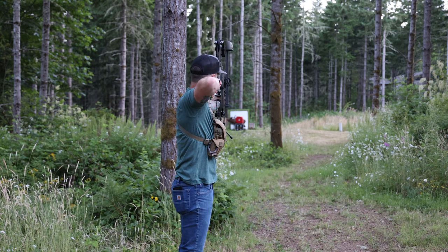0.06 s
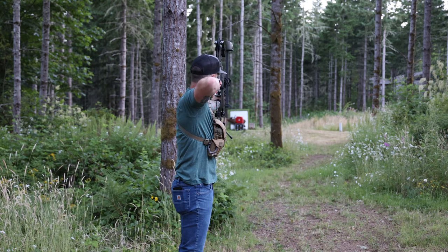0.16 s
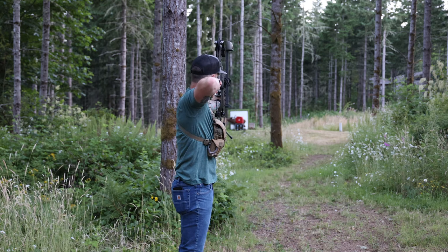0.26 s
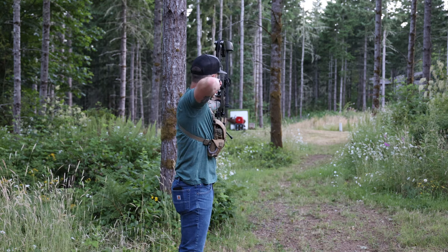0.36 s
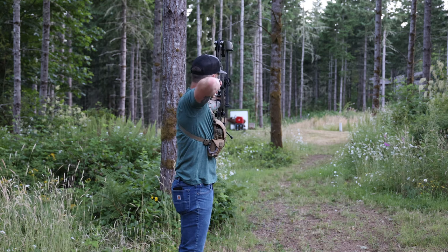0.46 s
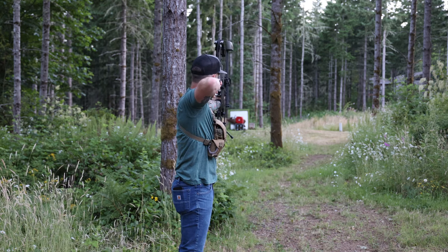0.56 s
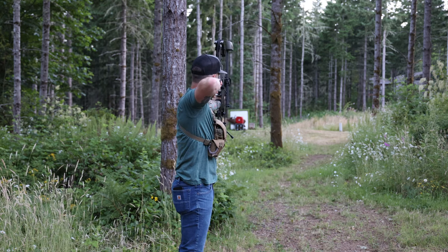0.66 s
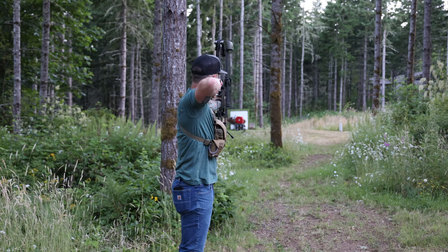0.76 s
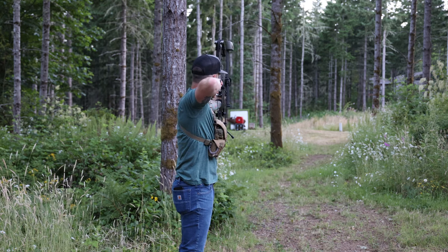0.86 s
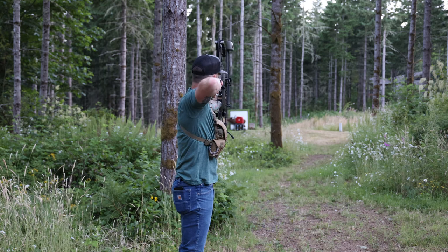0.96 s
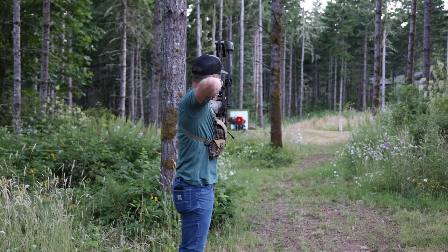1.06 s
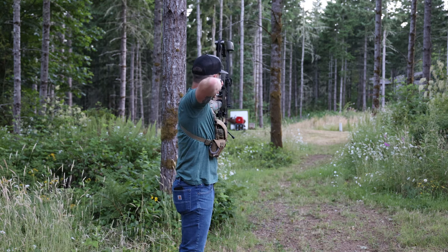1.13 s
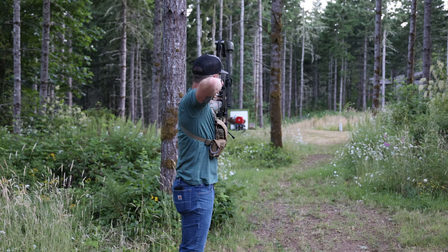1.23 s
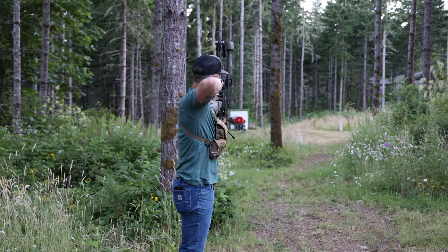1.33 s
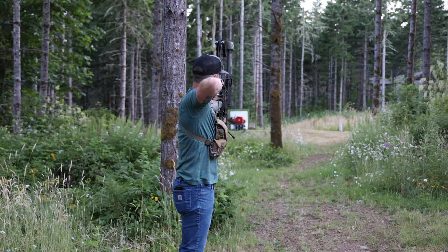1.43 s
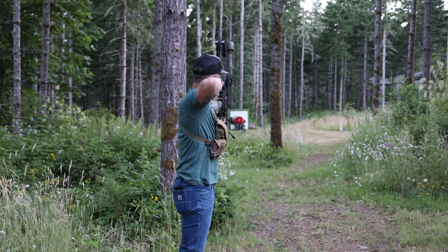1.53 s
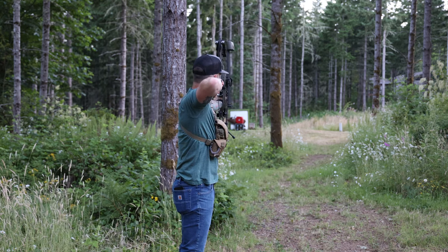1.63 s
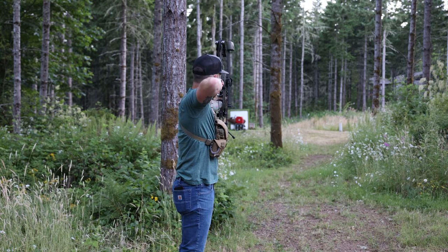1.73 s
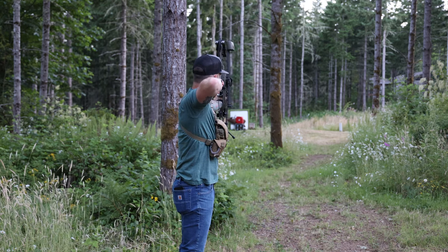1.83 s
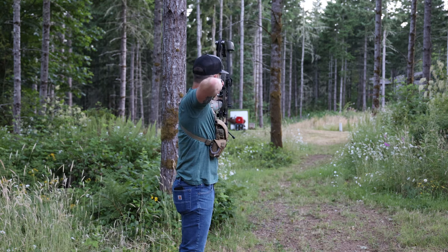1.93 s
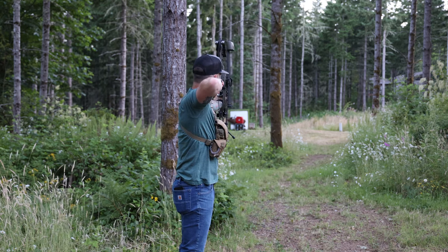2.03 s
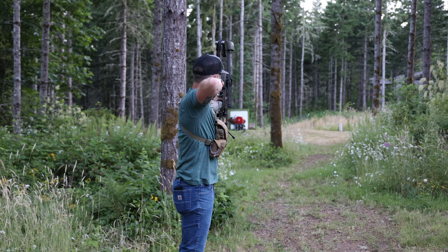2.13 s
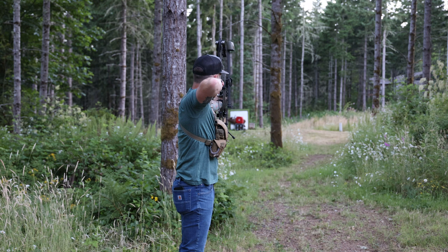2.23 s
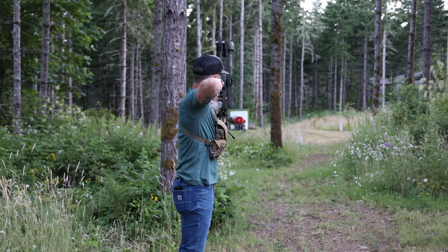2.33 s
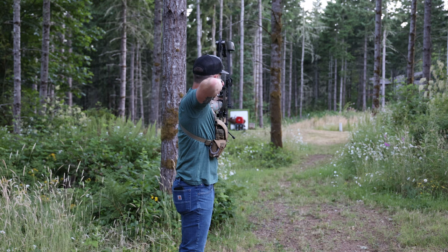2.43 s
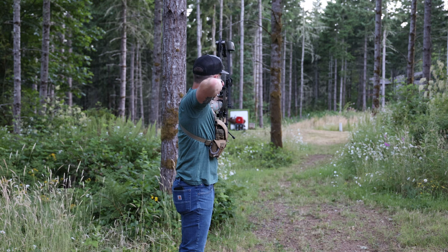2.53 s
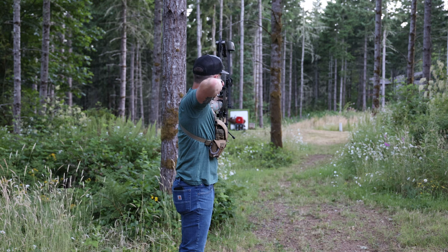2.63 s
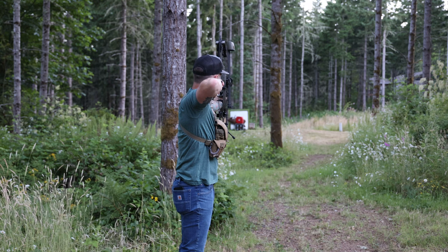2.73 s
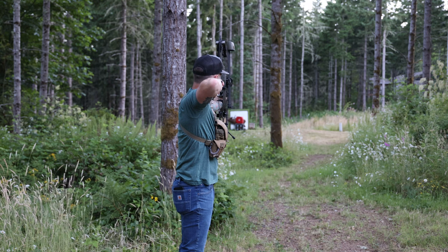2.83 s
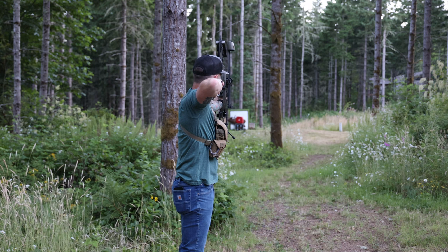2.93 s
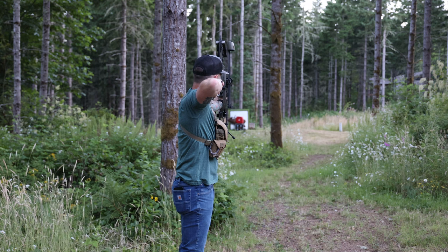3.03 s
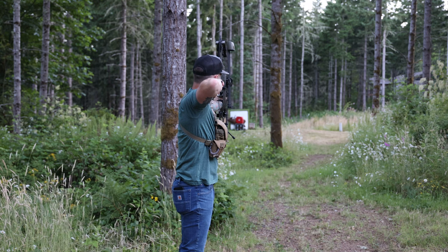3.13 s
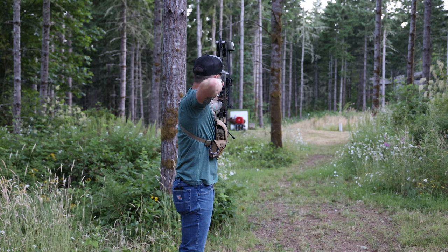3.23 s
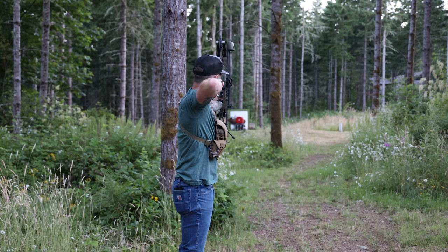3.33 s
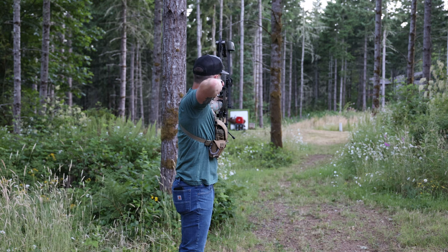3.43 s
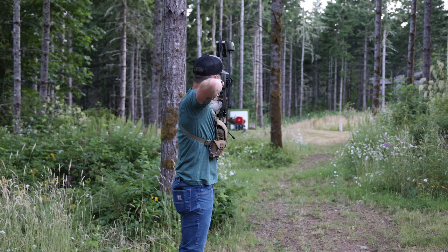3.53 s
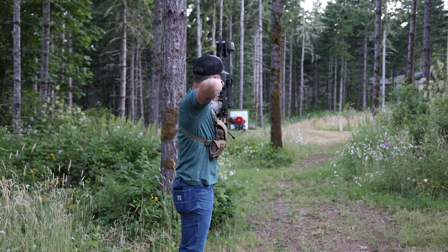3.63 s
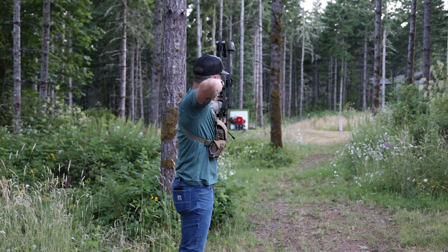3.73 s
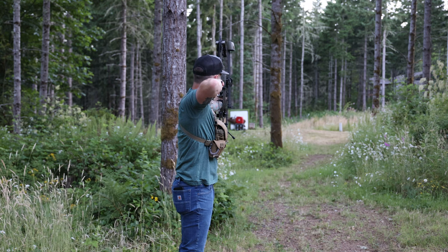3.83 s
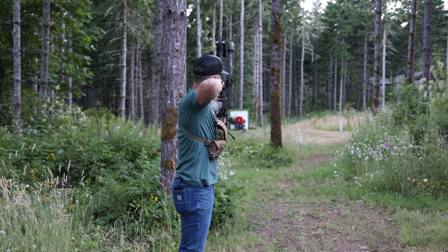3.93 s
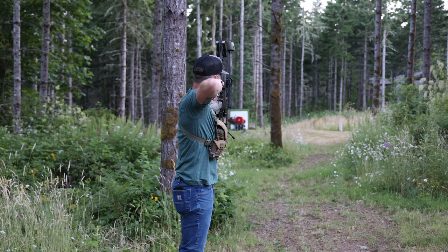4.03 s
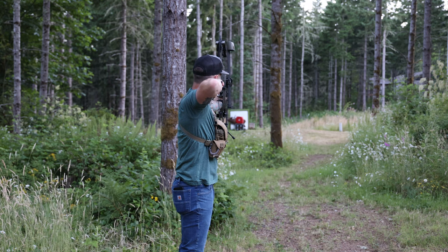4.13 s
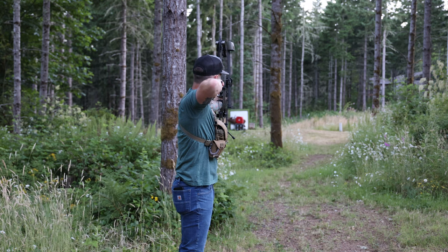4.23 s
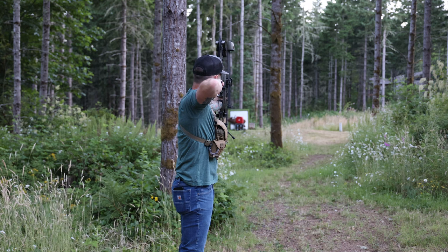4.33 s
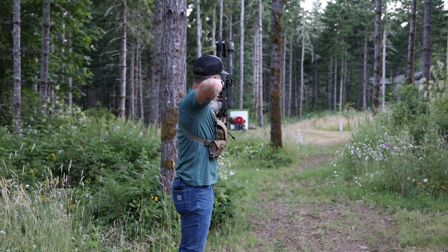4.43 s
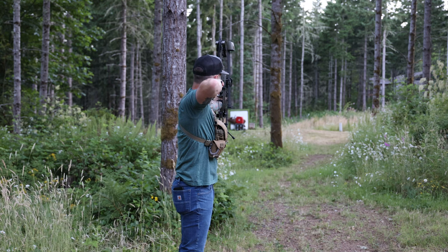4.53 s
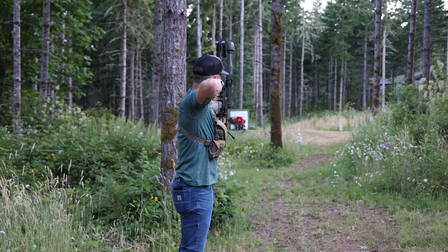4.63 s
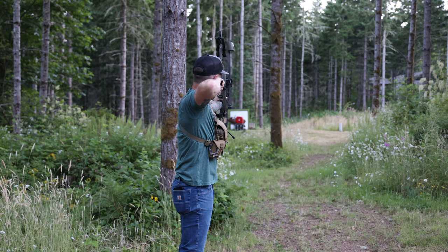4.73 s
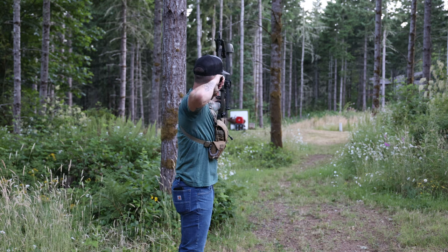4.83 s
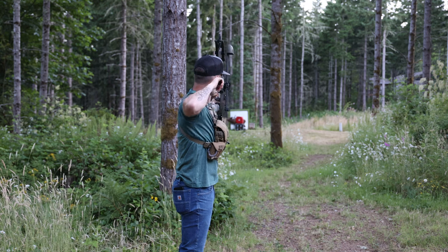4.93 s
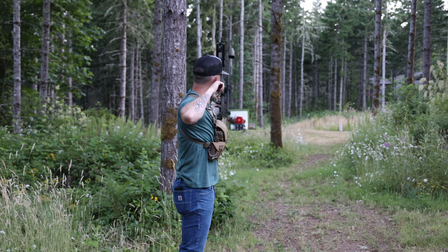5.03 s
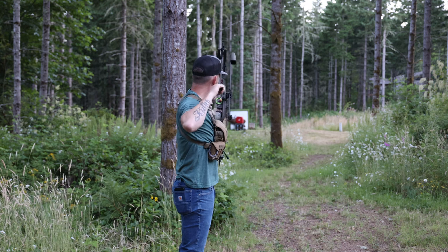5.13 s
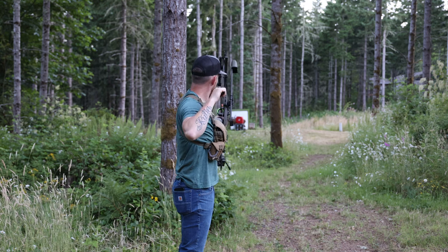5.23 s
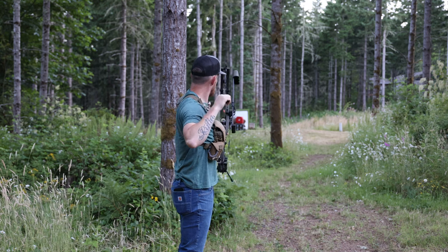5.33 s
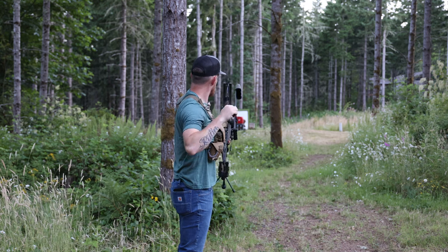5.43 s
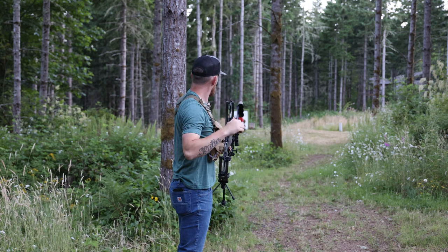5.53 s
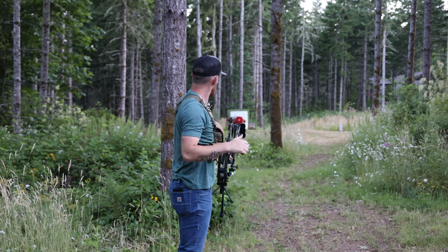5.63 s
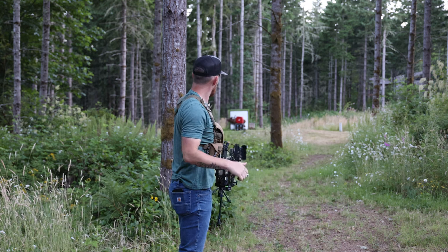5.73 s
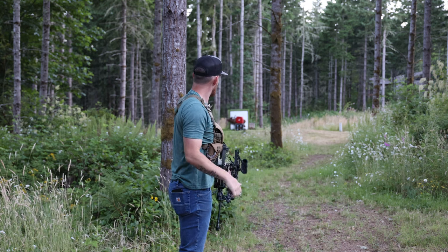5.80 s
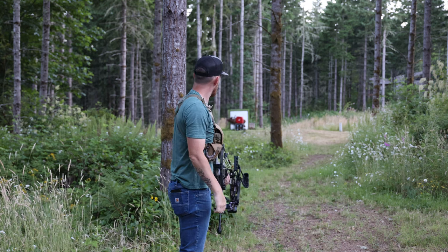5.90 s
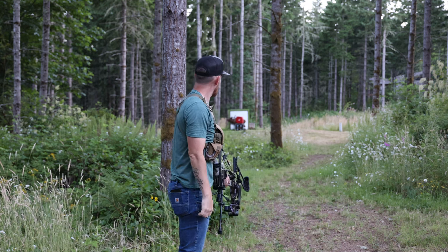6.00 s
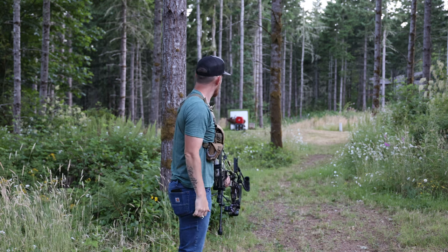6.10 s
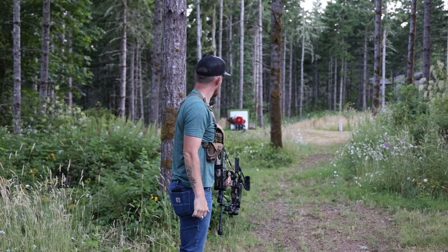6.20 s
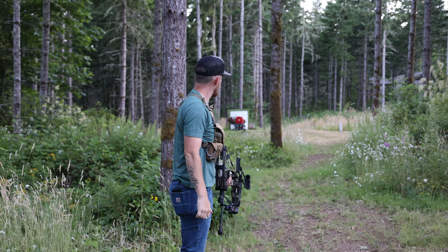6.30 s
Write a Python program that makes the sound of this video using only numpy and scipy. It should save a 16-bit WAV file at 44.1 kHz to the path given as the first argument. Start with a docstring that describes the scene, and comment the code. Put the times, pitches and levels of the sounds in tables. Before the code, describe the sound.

A quiet forest clearing with soft, receding road noise, faint engine hums and a small bird giving short chips about every second. Late on, a compound bow close to the microphone clicks and slams with a very loud crack. Half a second later the arrow smacks into a foam target farther off. Both hits scatter among the trees and die away, leaving chips and faint steady hiss.

```python
"""A distant road hushes away under faint engine hums while a small bird chips: filtered noise, sines, falling tones.
In a forest clearing a compound bow is shot close by: its release clicks in noise bursts, the arrow zips off the rest
as a climbing whistle, and the string slams home in cracks that ring the bow's decaying modes.
Half a second later the arrow smacks into a foam target: a coloured pulse, crunching noise and sagging thuds.
Decaying noise echoes scatter shot, strike and birds among the trees; a steady hiss lies under it all."""
import sys
import numpy as np
from scipy import signal
from scipy.fft import rfft, irfft
from scipy.io import wavfile

SR = 44100
rng = np.random.default_rng(int(sys.argv[2]) if len(sys.argv) > 2 else 0)


def generate_wav(signal):
    """Clip the signal to [-1, 1] and save it as 16-bit WAV at the path in sys.argv[1]."""
    frames = np.transpose(np.atleast_2d(signal))
    scaled = np.clip(frames, -1, 1) * 32767
    pcm = np.round(scaled).astype(np.int16)
    wavfile.write(sys.argv[1], SR, pcm)


N = 280476
TIME = np.arange(N) / SR

# string, cams and limbs hitting their stops: start_s, ring_db, crack_db, crack_t60_s
BLOWS = [(4.8392, -20, -19.5, 0.0091), (4.8413, 1, -5.5, 0.014), (4.8456, -26, -8, 0.012),
         (4.8506, -27, -18.5, .04)]
# arrow striking the target: start_s, smack_db, thump_db
TARGET = (5.3443, 6.2, -22)


def undb(db):
    """Decibels to gain."""
    return 10 ** (np.asarray(db) / 20)


def unit(x):
    """Scale to an rms of one."""
    return x / np.sqrt(np.mean(x ** 2))


def seconds(size):
    """Time axis of so many samples."""
    return np.arange(size) / SR


def fade(t, t60):
    """Exponential decay, 60 dB down after t60 seconds."""
    return np.exp(-np.log(1000) * t / max(t60, 1 / SR))


def envelope(t, length_s, attack_s, release_s):
    """Straight attack, hold and release; silent before zero and after the length."""
    return np.clip(np.minimum(t / attack_s, (length_s - t) / release_s), 0, 1)


def walk(rate):
    """Random wander with a spread near one: straight lines between random knots, rate knots a second."""
    knots = rng.standard_normal(1024)
    return np.interp(TIME * rate, np.arange(len(knots)), knots)


def add(track, s, sound):
    """Mix a sound into a track at time s."""
    start = int(round(s * SR))
    track[start:start + len(sound)] += sound[:N - start]


def on_log_axis(hz, points_hz, values):
    """Values joined by straight lines over log frequency."""
    return np.interp(np.log(hz + 1), np.log(points_hz), values)


def response(points, size=1024):
    """Minimum-phase impulse response with the given (Hz, relative dB) colour and unit energy."""
    hz = np.fft.rfftfreq(size, 1 / SR)
    log_gain = np.log(undb(on_log_axis(hz, *np.transpose(points))))
    # folding the cepstrum onto positive time packs the energy at the start
    cepstrum = irfft(log_gain)
    cepstrum[1:size // 2] *= 2
    cepstrum[size // 2 + 1:] = 0
    impulse = irfft(np.exp(rfft(cepstrum)))
    return impulse / np.linalg.norm(impulse)


def colour(x, points, size=1024):
    """Filter a sound by a (Hz, relative dB) colour."""
    return signal.oaconvolve(x, response(points, size=size))[:len(x)]


def cut(x, hz, kind, order=2):
    """Butterworth low-pass or high-pass filter."""
    sections = signal.butter(order, min(hz, .45 * SR), kind, fs=SR, output="sos")
    return signal.sosfilt(sections, x)


def crack(points, t60):
    """Contact noise: random-sign pulses, coloured and dying away exponentially."""
    t = seconds(size=4096)
    return colour(rng.choice([-1, 1], len(t)) * fade(t, t60), points)


def burst(s, power):
    """A hit as the whole forest hears it: one pulse of smooth colour at time s."""
    out = np.zeros(N)
    add(out, s, response(power))
    return out


def hiss(db=-60, channel_db=-76):
    """Steady microphone hiss, and a fainter white hiss, drawn separately for each channel."""
    # microphone hiss: pitch_hz, relative_db
    hiss_colour = [(100, -7), (2500, 0), (4000, 4.5), (7000, 1), (11000, 0), (16000, -3)]
    microphone = undb(db) * colour(rng.standard_normal(N), hiss_colour)
    separate = undb(channel_db) * rng.standard_normal((2, N))
    return microphone + separate


def road(split_hz=1000, waver_db=.5, rumble_db=-62):
    """Tyre roar draws away, its body fading faster than its upper band, over a low rumble."""
    # tyre roar: pitch_hz, relative_db
    road_colour = [(15, -52), (25, -20.5), (64, -8), (96, -14), (119, -10.5), (140, -17.5), (197, -10),
                   (306, -11), (331, -14), (430, -8.5), (629, -6), (900, -1), (1150, -2.5), (1850, -14),
                   (3000, -24), (3900, -32), (6600, -120)]
    # low rumble under the roar: pitch_hz, relative_db
    rumble_colour = [(25, -8), (80, -4), (200, 0.5), (380, -5), (1500, -42), (5000, -64)]
    body_start_db, body_fade_db_per_s = -39.5, 1.39
    upper_start_db, upper_fade_db_per_s = -42.5, 1.0
    # one passing vehicle lifts the upper band and the rumble for a moment
    swell_at_s, swell_width_s, swell_peak_db = 3.02, 0.68, 2

    swell_db = swell_peak_db * np.exp(-((TIME - swell_at_s) / swell_width_s) ** 2)
    body_db = body_start_db - body_fade_db_per_s * TIME
    upper_db = upper_start_db - upper_fade_db_per_s * TIME + swell_db
    # separate noise for each band
    body = cut(colour(rng.standard_normal(N), road_colour, size=4096), split_hz, "low", order=3)
    upper = cut(colour(rng.standard_normal(N), road_colour, size=4096), split_hz, "high", order=3)
    tyres = unit(body) * undb(body_db) + unit(upper) * undb(upper_db)
    rumble = colour(rng.standard_normal(N), rumble_colour, size=4096)
    return tyres * undb(waver_db * walk(9)) + undb(rumble_db + swell_db) * rumble


def engines(waver_db=2):
    """Of each far engine only one wavering, slowly sinking tone carries through the trees."""
    # hums drifting in and out: start_s, length_s, start_pitch_hz, level_db (rms)
    hums = [(-.25, 1.3, 76, -55), (-.25, 0.79, 206, -56.5), (1.05, .6, 62, -55), (1.4, 1.3, 65.3, -54.5),
            (2.452, 1.3, 61, -64.5), (4.501, 2.3, 79, -66.5), (4.854, .7, 194, -60),
            (5.656, 0.49, 190.5, -56.5)]
    attack_s, release_s, sag_hz_per_s = 0.23, 0.26, 2.3
    out = np.zeros(N)
    for s, length, start_hz, db in hums:
        t = TIME - s
        pitch_hz = start_hz - sag_hz_per_s * t
        tone = np.sqrt(2) * np.sin(2 * np.pi * np.cumsum(pitch_hz) / SR)
        level = undb(db + waver_db * walk(24))
        out += level * envelope(t, length, attack_s, release_s) * tone
    return out


def peeps(quaver=0.011):
    """Birds deeper in the wood: thin whistles that swell and die, their pitch quavering slightly."""
    # faint whistles: start_s, pitch_hz, level_db (before scene() sets the overall level), length_s
    peep_list = [(0.547, 7900, -67, .1), (1.489, 5430, -61, 0.047), (3.271, 2570, -59, 0.14),
                 (4.64, 6230, -61, 0.026)]
    out = np.zeros(N)
    for s, hz, db, length in peep_list:
        swell = np.hanning(int(length * SR))
        pitch_hz = hz * (1 + quaver * walk(140)[:len(swell)])
        add(out, s, undb(db) * swell * np.sin(2 * np.pi * np.cumsum(pitch_hz) / SR))
    return out


def bird(second_db=-1, third_db=-14, throat_width_hz=1100, plunge_power=1.52):
    """Each chip plunges over two octaves; its harmonics light up as they cross the throat resonance."""
    # chips: start_s, level_db, throat_hz, throat_height_db
    chip_list = [(0.2443, -35, 5870, 7.5), (0.8502, -35.5, 5600, 10), (1.6324, -38, 6200, 12.5),
                 (2.5822, -37, 5530, 6.5), (3.2296, -32.5, 5800, 7), (3.7327, -34.5, 5820, 10),
                 (4.258, -34, 6230, 6), (4.764, -33.5, 5860, 6.5), (5.1394, -37.5, 5500, 2.5),
                 (6.1913, -41.5, 6700, 17.5)]
    # what the beak lets out: pitch_hz, gain_db
    beak_colour = [(2000, -18), (3100, -6), (4300, -3), (6300, -1.5), (7400, -3.5), (8600, -0.5),
                   (9600, -6), (11000, -14), (14000, -32)]
    # every chip falls from a high note and levels out on a low one
    top_hz, bottom_hz, plunge_s = 10330, 2188, .0033
    length_s, attack_s, release_s = 0.012, .0008, .006

    out, t = np.zeros(N), seconds(size=600)
    pitch_hz = bottom_hz + (top_hz - bottom_hz) * np.exp(-(t / plunge_s) ** plunge_power)
    shape = envelope(t, length_s, attack_s, release_s)
    for s, db, throat_hz, height_db in chip_list:
        for k, harmonic_db in enumerate([0, second_db, third_db], 1):
            hz = k * pitch_hz
            throat_db = height_db / (1 + (2 * (hz - throat_hz) / throat_width_hz) ** 2)
            beak_db = on_log_axis(hz, *np.transpose(beak_colour))
            # harmonics stay silent above half the sample rate
            tone = (hz < SR / 2) * np.sin(2 * np.pi * np.cumsum(hz) / SR)
            add(out, s, undb(db + harmonic_db + throat_db + beak_db) * shape * tone)
    return out


def forest(patchy=0.25, near_rise_s=0.0011, far_rise_s=0.1):
    """Two echo responses in decaying noise: a quick scatter from the brush, a long one from the trunks."""
    # scatter from ground, brush and trunks: pitch_hz, near_db, near_t60_s, far_db, far_t60_s
    scatter = [(150, -15, .2, -5, 3.7), (350, -11, 0.31, -22, 1.3), (700, 2, 0.18, -43, 1.3),
               (1440, -8.5, 0.22, -14.5, 1.7), (3500, -10.5, 0.2, -21.5, 1.3), (7950, -11, 0.19, -21, 1.04),
               (14000, -12.5, .19, -26, 2.1)]
    t = seconds(size=65536)
    hz = np.fft.rfftfreq(len(t), 1 / SR)
    # patchy noise: some echoes stand out by chance
    patches = np.exp(patchy * rng.standard_normal(len(t)))
    echoes = rfft(unit(rng.standard_normal(len(t)) * patches))
    near, far = 0, 0
    # each row of the identity matrix picks out one band, cross-fading into its neighbours
    for share, (_, near_db, near_t60, far_db, far_t60) in zip(np.eye(len(scatter)), scatter):
        band = irfft(echoes * on_log_axis(hz, np.transpose(scatter)[0], share))
        brush = fade(t, near_t60) * (1 - np.exp(-t / near_rise_s))
        trunks = fade(t, far_t60) * (1 - np.exp(-t / far_rise_s))
        near = near + band * undb(near_db) * brush / np.linalg.norm(brush)
        far = far + band * undb(far_db) * trunks / np.linalg.norm(trunks)
    return near, far


def among_trees(sound, echoes, near_db, far_db):
    """What brush and trunks scatter back of a sound, by convolution with their echoes."""
    near, far = echoes
    return signal.oaconvolve(sound, undb(near_db) * near + undb(far_db) * far)[:N]


def target(crunch_db=-29, crunch_t60=0.075, ground_share=0.39, thud_attack_s=0.0019):
    """The point pierces the face in one sharp smack; the foam crunches and thumps as it brakes the shaft."""
    # piercing the face: pitch_hz, relative_db
    smack_colour = [(60, -11), (220, 7), (550, -1.5), (1600, 4), (2500, -8), (3700, -0.5), (4900, -6.5),
                    (6300, -32), (8400, -10.5), (10500, -22), (13000, -13), (16000, -33)]
    # crushed foam: pitch_hz, relative_db
    crunch_colour = [(100, -8), (500, -5), (1600, 3), (2600, -11), (4500, -13), (7000, -16), (16000, -27)]
    # the foam gives, then grips the shaft: delay_s, length_s, start_pitch_hz, level_db (relative to the thump)
    thuds = [(0, 0.004, 290, -1), (.007, 0.02, 454, -4)]
    thud_sag_s = 0.013

    out, t = np.zeros(N), seconds(size=1400)
    s, smack_db, thump_db = TARGET
    smack = undb(smack_db) * response(smack_colour)
    add(out, s, smack)
    # the wave grazing the ground arrives inverted, a fraction of a millisecond later
    add(out, s + .00018, -ground_share * smack)
    add(out, s, undb(crunch_db) * crack(crunch_colour, crunch_t60))
    for delay, length, start_hz, db in thuds:
        pitch_hz = start_hz * np.exp(-t / thud_sag_s)
        shape = envelope(t, length, thud_attack_s, length - thud_attack_s)
        add(out, s + delay, undb(thump_db + db) * shape * np.sin(2 * np.pi * np.cumsum(pitch_hz) / SR))
    return out


def strike():
    """The arrow's hit heard directly and as a wash from the forest, its brush scatter slow to build up."""
    # the strike's power summed over all directions: pitch_hz, relative_db
    strike_power = [(40, -22), (120, -2.5), (300, 1), (550, -2), (1500, 1), (2400, -3.5), (4200, -2.5),
                    (6000, -17), (8500, -11), (11000, -24), (16000, -27)]
    far_echoes = forest(patchy=.29, near_rise_s=.012, far_rise_s=0.056)
    wash = among_trees(burst(TARGET[0], strike_power), far_echoes, near_db=1.5, far_db=7.5)
    return target() + wash


def release():
    """The jaw of the release aid springs open and the string loop flicks past it, in short noise bursts."""
    # clicks: start_s, level_db, t60_s
    clicks = [(4.8101, -8.5, 0.0024), (4.8125, -18.5, 0.02), (4.822, -28, .008)]
    # click colour: pitch_hz, relative_db
    click_colour = [(300, -16), (1500, -5.5), (3500, -4.5), (6500, -9), (8400, -2), (10700, -2),
                    (13500, -1), (16000, -4)]
    out = np.zeros(N)
    for s, db, t60 in clicks:
        add(out, s, undb(db) * crack(click_colour, t60))
    return out


def slide(scrape_db=1, climb_power=2.71, swell_power=1.1):
    """The shaft zips over the rest: whistle and scrape swell, and the whistle climbs, with its speed."""
    start_s, length_s, level_db = 4.832, .0095, -23
    from_hz, to_hz = 1800, 6150
    out = np.zeros(N)
    progress = np.linspace(0, 1, int(length_s * SR))
    pitch_hz = from_hz + (to_hz - from_hz) * progress ** climb_power
    whistle = np.sin(2 * np.pi * np.cumsum(pitch_hz) / SR)
    # scrape level is relative to the whistle
    scrape = undb(scrape_db) * rng.standard_normal(len(pitch_hz))
    add(out, start_s, undb(level_db) * progress ** swell_power * (whistle + scrape))
    return out


def bow(contact_s=0.00022, lowest_hz=80):
    """Each blow cracks and sets the same decaying modes ringing, neighbours in opposite senses."""
    # limbs, riser, cams and accessories: pitch_hz, level_db (relative to the blow's ring), t60_s
    bow_modes = [(104, -25.5, 0.05), (275, -12, 0.028), (336, -8.5, 0.041), (565, -26, 0.22),
                 (735, -26, 0.21), (1030, -23, 0.059), (1226, -4.5, 0.03), (1450, -2, 0.018),
                 (1410, -26, .11), (1644, -15.5, 0.043), (1870, -20, 0.058), (2725, -15, 0.038),
                 (2950, -25, .04), (3710, -22, 0.052), (4000, -38, 0.044), (4780, -14.5, 0.051),
                 (4980, -21, .06), (5270, -22.5, 0.062), (7630, -31, .04), (8000, -31, .06),
                 (8030, -27, .04), (8368, -27, .05)]
    # crack of the stops: pitch_hz, relative_db
    crack_colour = [(100, -1), (300, -3.5), (900, 6.5), (1500, -0.5), (2250, -9), (2900, -2.5), (4900, -3),
                    (6900, -14), (8300, 1.5), (10500, -17.5), (13000, -5), (16000, -24)]
    out, t = np.zeros(N), seconds(size=12000)
    ring = np.zeros(len(t))
    for k, (hz, db, t60) in enumerate(bow_modes):
        ring += (-1) ** k * undb(db) * fade(t, t60) * np.sin(2 * np.pi * hz * t)
    # the contact's finite length softens the onset
    ring = ring * (1 - np.exp(-t / contact_s))
    for s, ring_db, crack_db, t60 in BLOWS:
        add(out, s, undb(ring_db) * ring)
        add(out, s, undb(crack_db) * crack(crack_colour, t60))
    # a high-pass removes the deep bass and offset left by the summed modes
    return cut(out, lowest_hz, "high")


def shot(echoes):
    """The bow heard directly, off the nearest trunks, and as a wash from the whole forest."""
    # single echoes from the nearest big trunks: delay_s, level_db (relative to the direct sound)
    trunk_echoes = [(0.0367, -22.5), (0.109, -33)]
    # the shot's power summed over all directions, which is what the forest hears: pitch_hz, relative_db
    shot_power = [(40, -25), (120, -9), (300, 0.5), (700, -0.5), (1400, 4), (2250, -4.5), (3200, 0.5),
                  (5000, 1), (7000, -5), (8500, 0), (10500, -12), (13500, -5), (16000, -21)]
    click, slam = release(), slide() + bow()
    out = click + slam + among_trees(click, echoes, near_db=1.0, far_db=-6)
    for delay, db in trunk_echoes:
        add(out, delay, undb(db) * slam)
    # the wash starts with the second blow, the one that rings loudest
    return out + among_trees(burst(BLOWS[1][0], shot_power), echoes, near_db=16.0, far_db=15.5)


def scene():
    """Road, engines, birds, strike and shot, the same in both ears, over a hiss that differs slightly."""
    echoes = forest()
    chips = bird()
    # the birds deeper in the wood arrive only as scatter
    birds = chips + among_trees(chips + undb(7) * peeps(), echoes, near_db=4.0, far_db=0)
    return hiss() + road() + engines() + birds + strike() + shot(echoes)


def record(dry):
    """Peaks beyond full scale are clipped flat, then a steep low-pass cuts the top."""
    top_hz = 15950
    clipped = np.clip(dry, -1, 1)
    return signal.sosfilt(signal.ellip(10, .2, 80, top_hz, fs=SR, output="sos"), clipped)


dry = scene()
out = record(dry)
generate_wav(out)
```